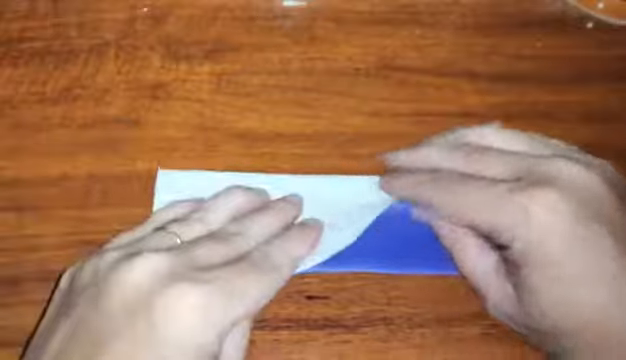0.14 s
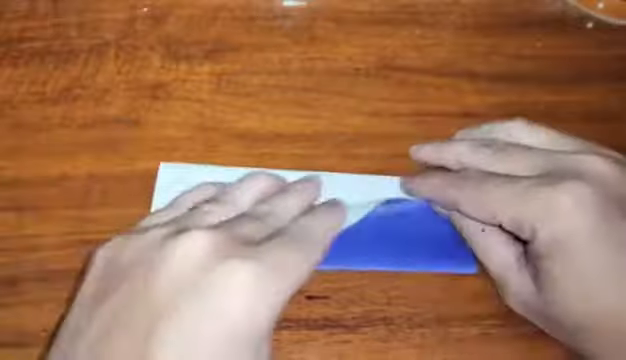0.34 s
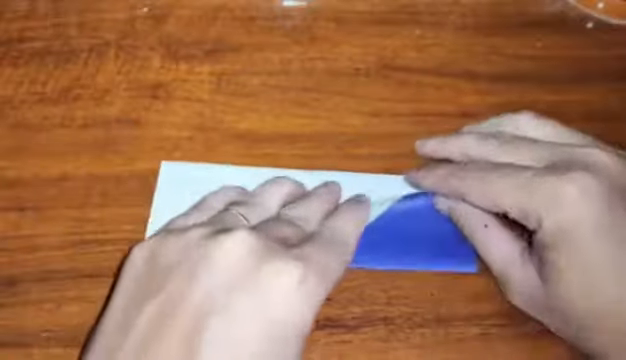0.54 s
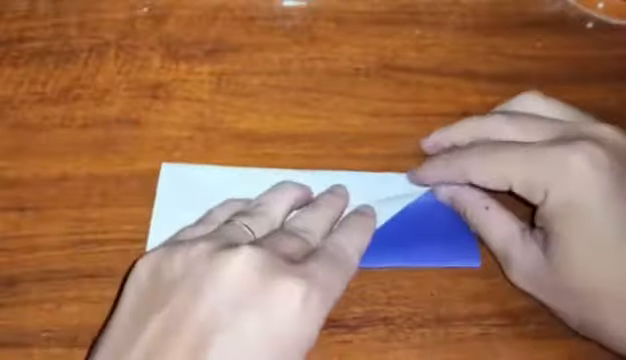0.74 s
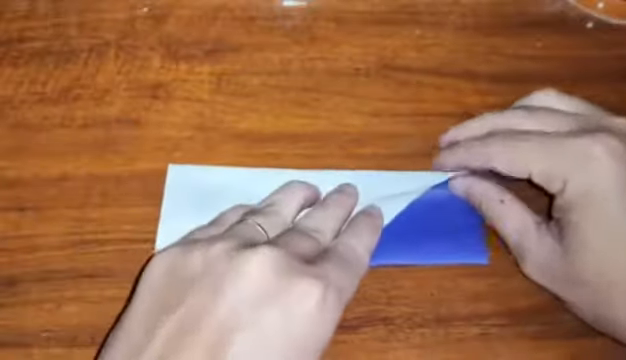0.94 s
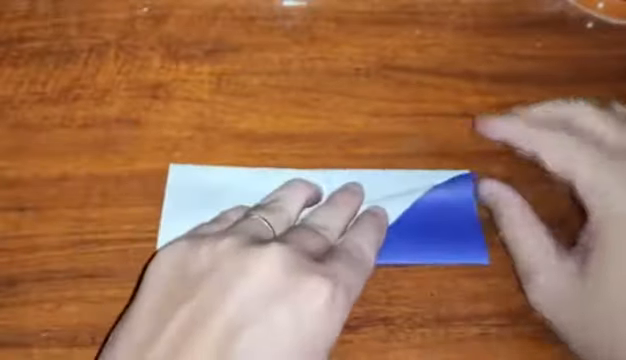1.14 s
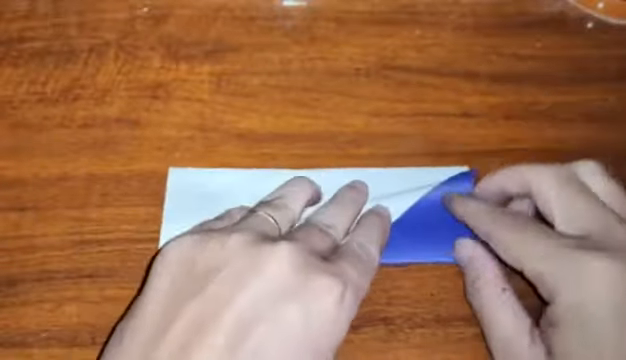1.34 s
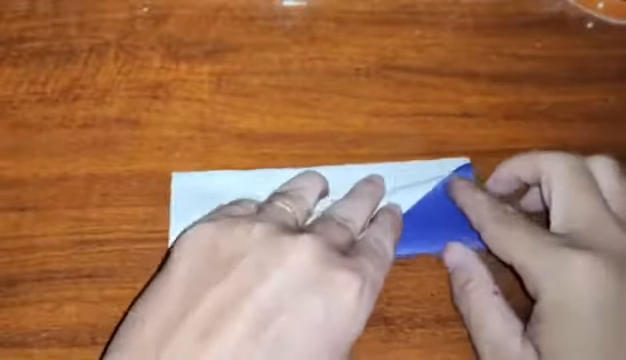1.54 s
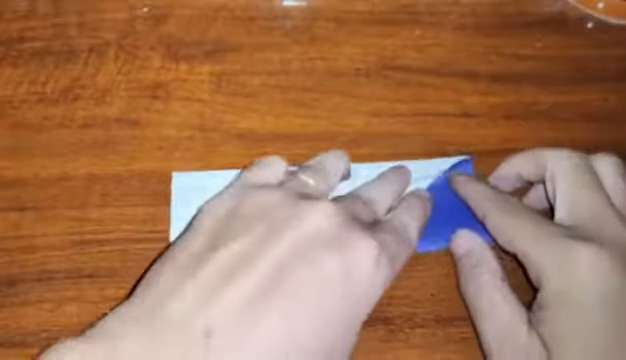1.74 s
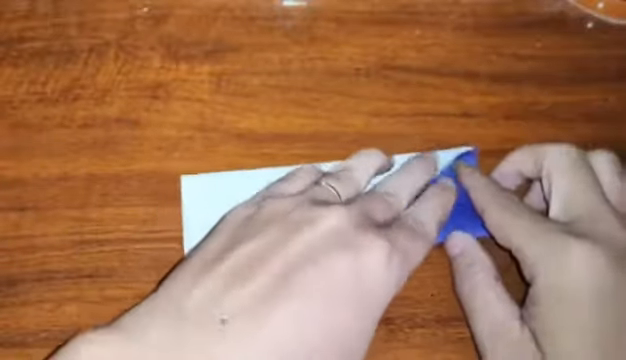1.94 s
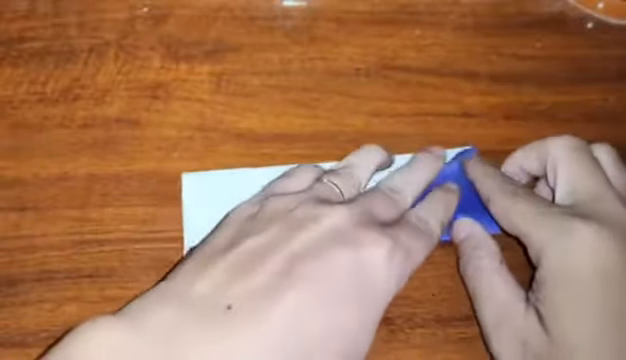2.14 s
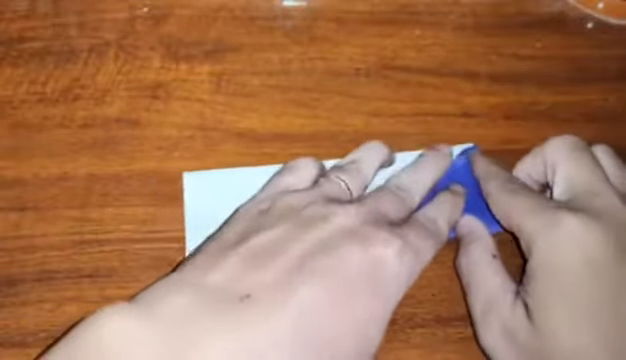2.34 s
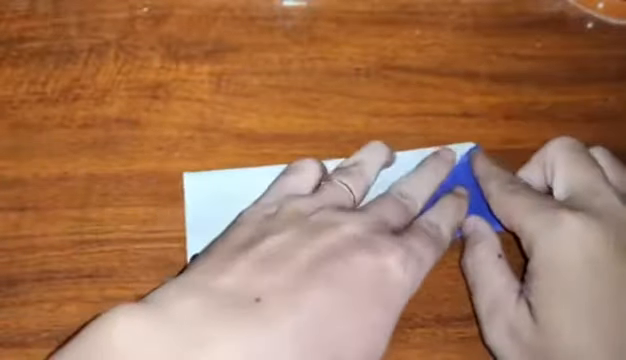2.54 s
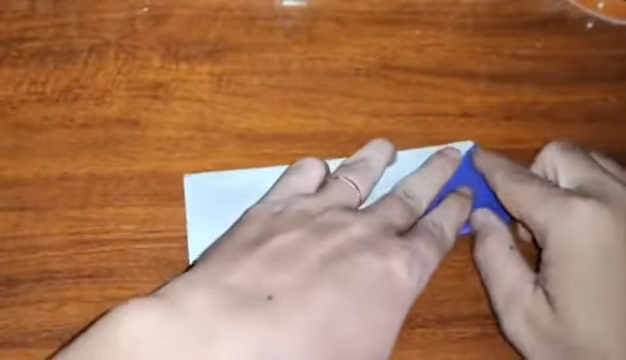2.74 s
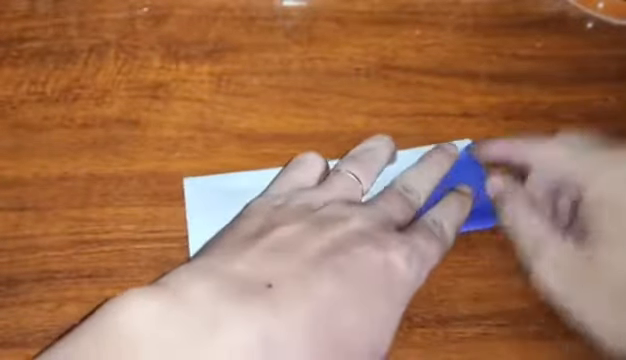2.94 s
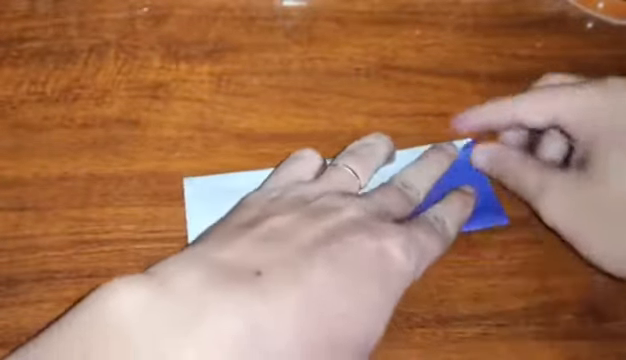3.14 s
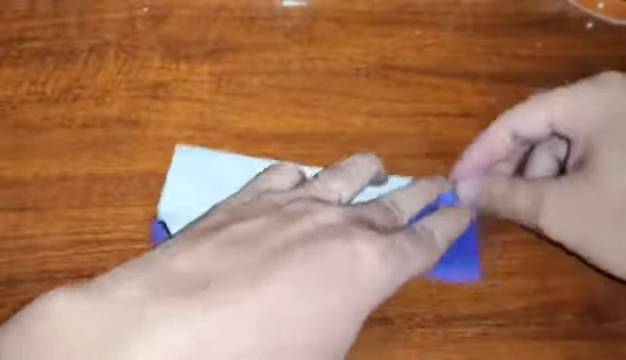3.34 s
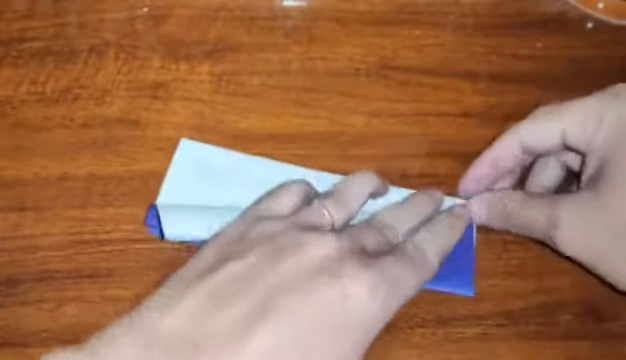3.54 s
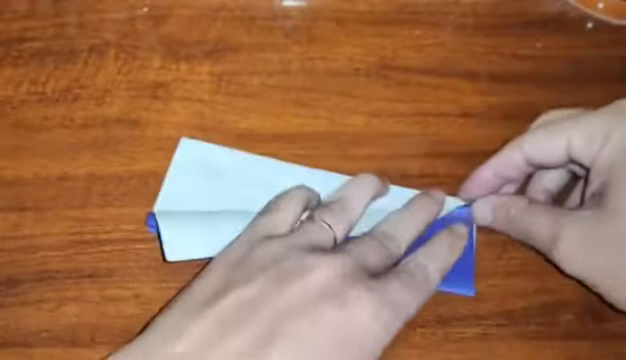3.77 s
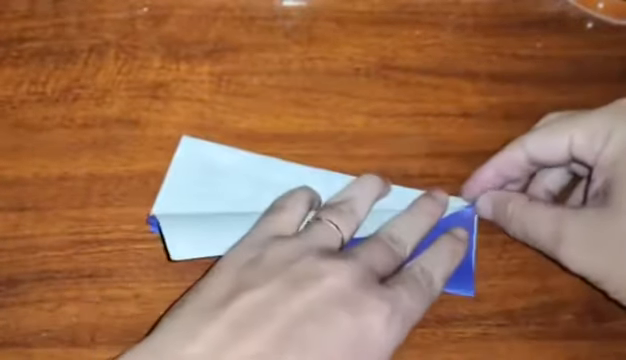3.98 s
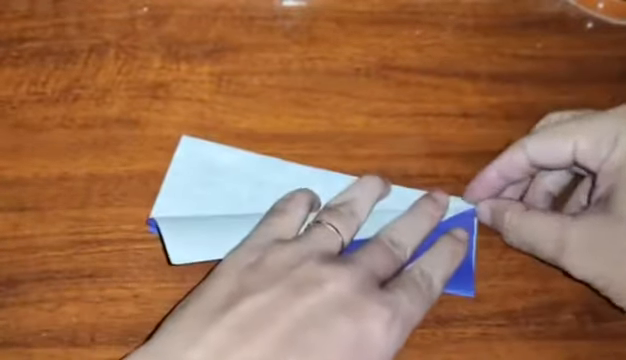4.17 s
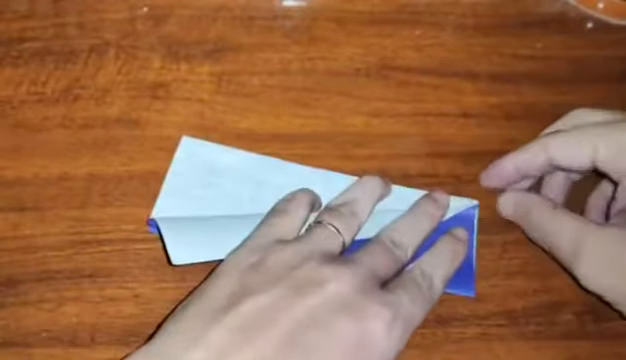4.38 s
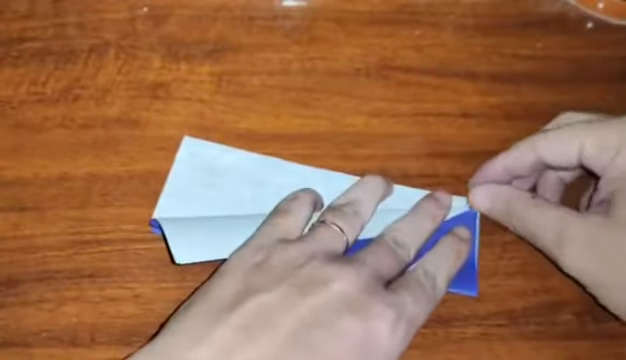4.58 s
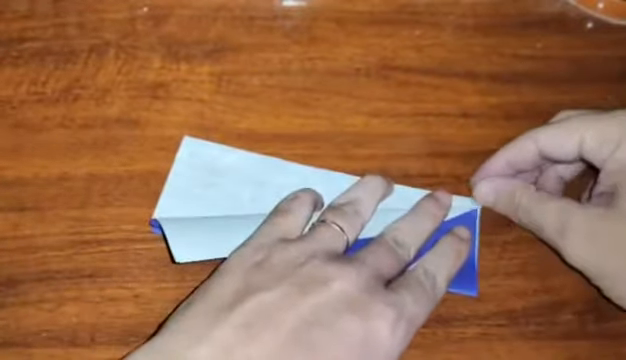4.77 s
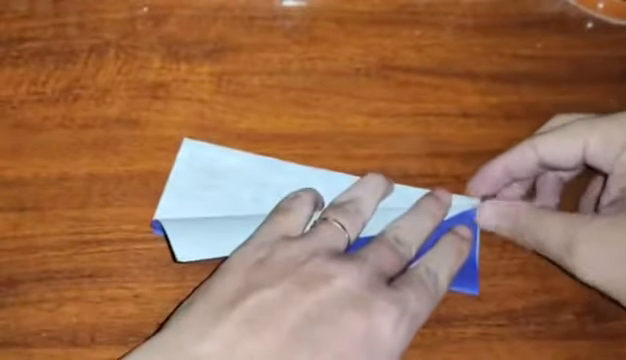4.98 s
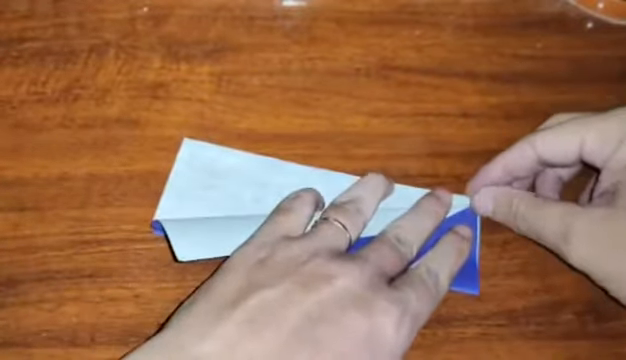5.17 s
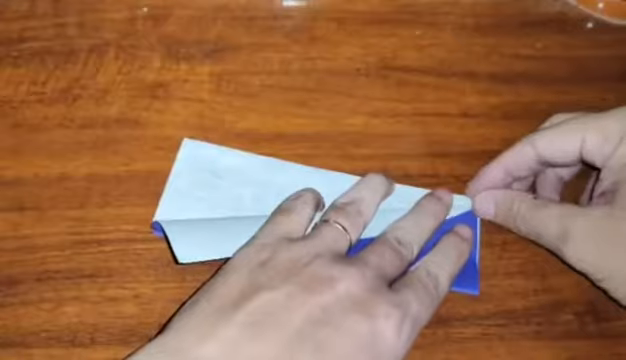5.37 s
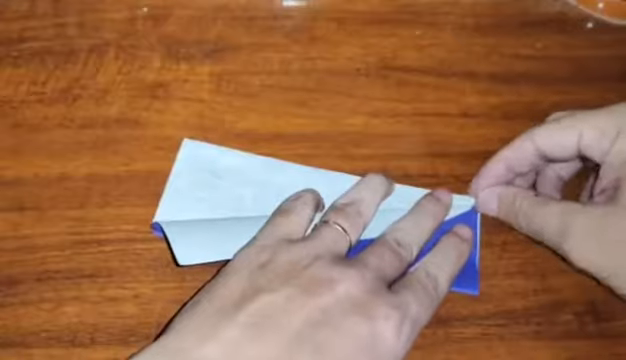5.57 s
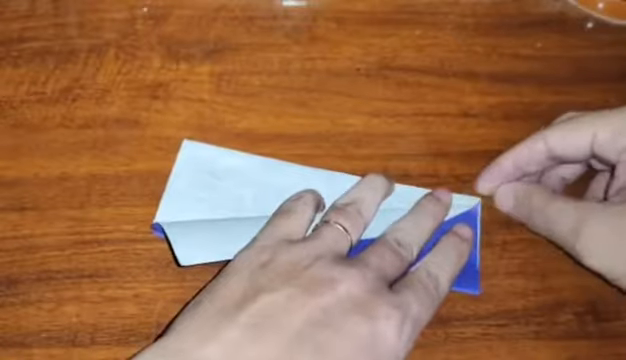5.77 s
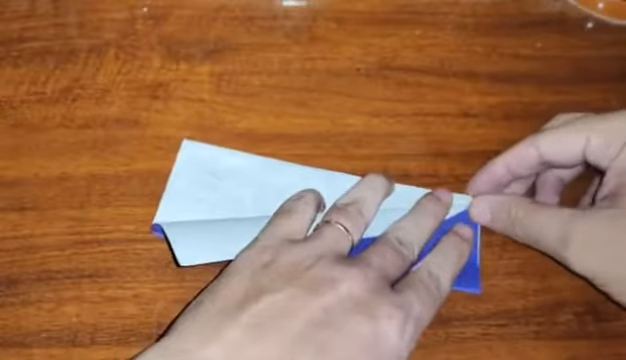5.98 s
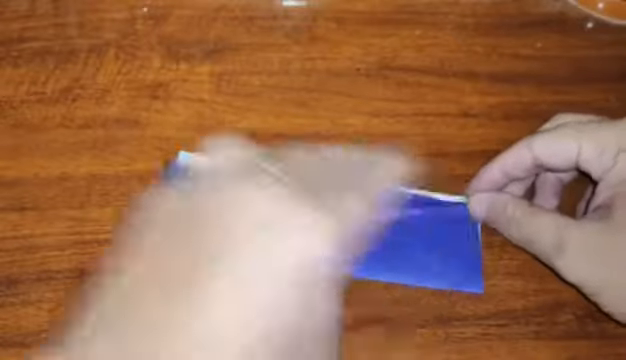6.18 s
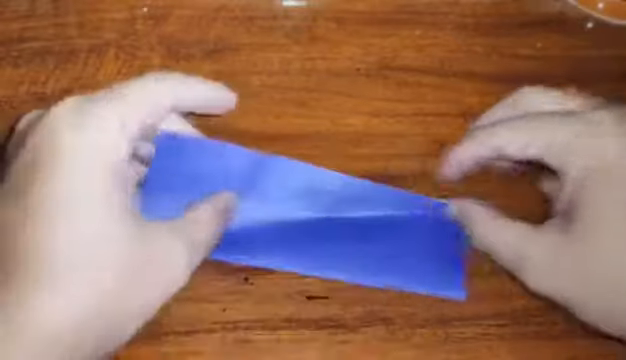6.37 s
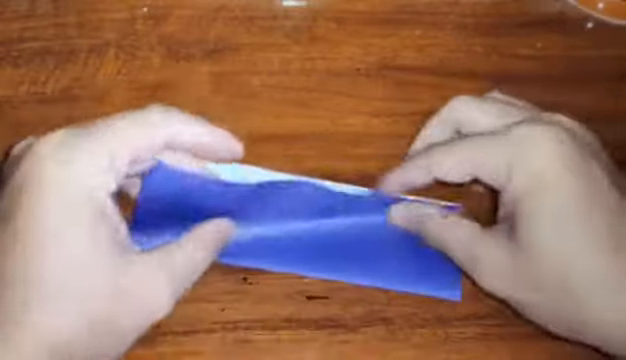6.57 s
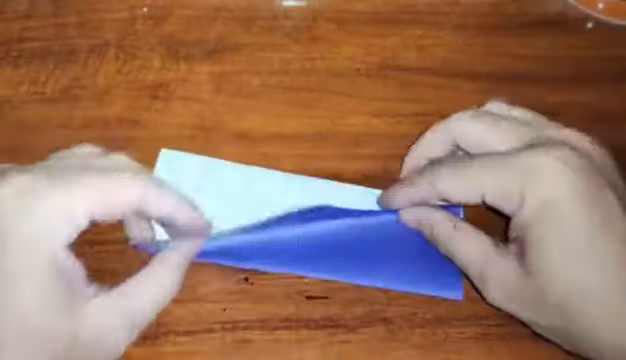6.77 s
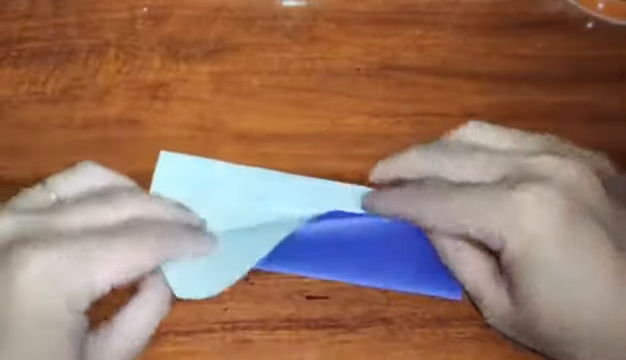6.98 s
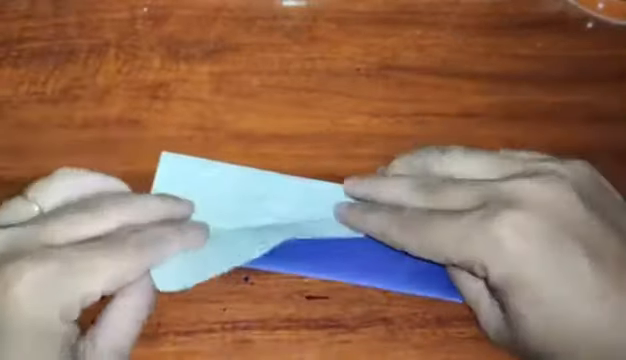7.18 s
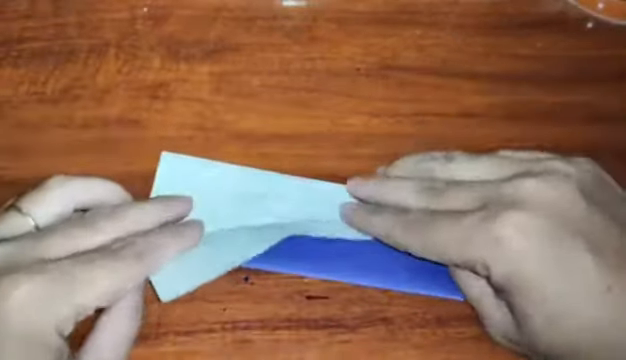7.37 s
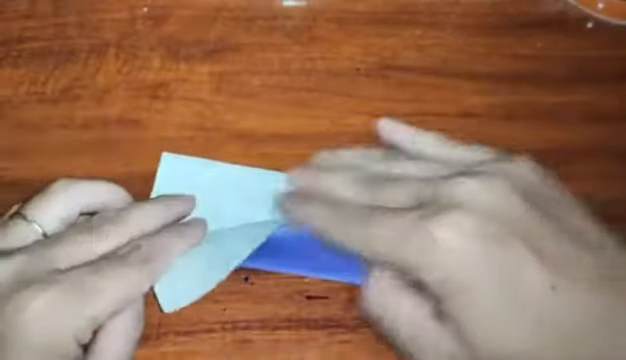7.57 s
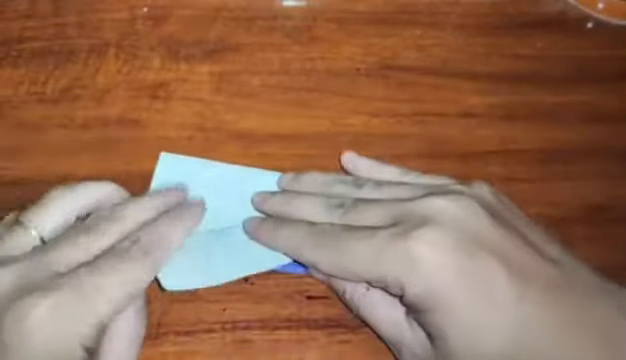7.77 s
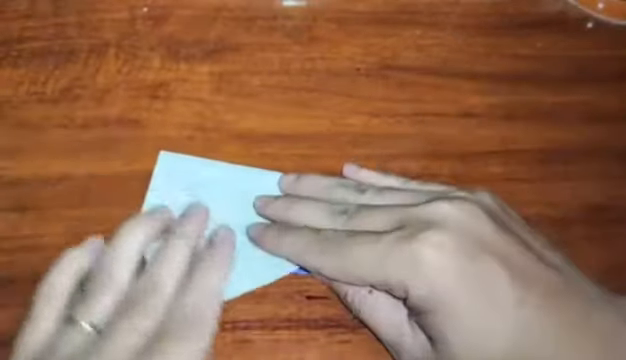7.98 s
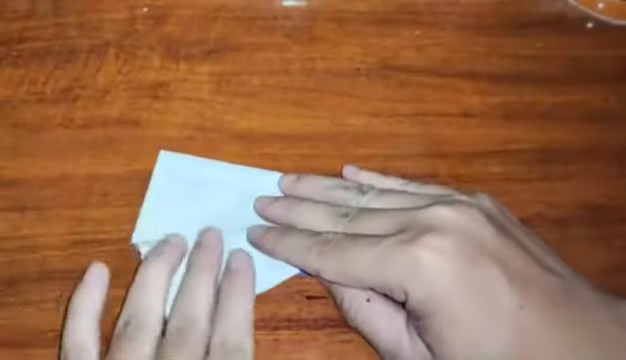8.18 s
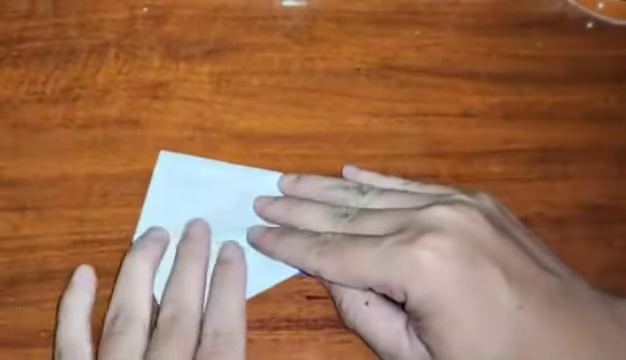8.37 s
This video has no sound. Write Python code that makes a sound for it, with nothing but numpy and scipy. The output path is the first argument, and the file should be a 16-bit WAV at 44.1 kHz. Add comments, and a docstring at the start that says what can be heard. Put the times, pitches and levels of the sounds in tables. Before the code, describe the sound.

Close to a small sheet of paper on a wooden table, fingers slide with bright, grainy hiss and duller rustle. Short crisp rubs and sharp little pops come first, then a quieter spell with only isolated ticks and one clear snap. A louder burst of flipping and creasing follows, with soft fingertip thuds, before it eases off. A small quiet room adds a short tail and faint steady air.

```python
"""Fingers rub over paper with a grainy hiss as two hands fold and crease a sheet in a small quiet room.
The hiss and a duller rustle are filtered noise and random clicks, shaped stroke by stroke.
The sheet buckles in snaps and ticks: short noise bursts with a ringing spectrum.
Fingertips thud softly on the wooden table, a push ringing decaying sine modes.
Sparse random reflections give these sounds a short tail; steady coloured noise is the room's air."""
import sys
import numpy as np
from scipy import signal
from scipy.fft import rfft, irfft, next_fast_len
from scipy.io import wavfile
from scipy.ndimage import uniform_filter1d

SR = 44100
rng = np.random.default_rng(int(sys.argv[2]) if len(sys.argv) > 2 else 0)


def dump_mix(stems):
    """Bounce the given channels to the path in sys.argv[1] as a 16-bit WAV at rate SR."""
    frames = np.atleast_2d(stems).T  # one column per channel
    limited = np.clip(frames, -1, 1)  # hard clip at full scale
    pcm = np.round(limited * 32767).astype(np.int16)
    wavfile.write(sys.argv[1], SR, pcm)


N = 371321
TIME = np.arange(N) / SR

# finger strokes: (start [s], length [s], relative hiss level [dB], relative rustle level [dB],
# swell from start to end [dB], treble lift of the hiss and rustle [dB])
STROKES = [(-0.02, 0.12, -52.5, -55.5, -11, -3.5), (0.096, 0.2, -50, -60, 6, 1.5),
           (0.312, 0.34, -56, -59.5, -5, -0.5), (0.757, 0.022, -62, -62.5, -2, 1),
           (0.806, 0.18, -59, -59.5, -15.5, 1.5), (1.062, 0.12, -59.5, -64.5, -2, 3),
           (1.315, 0.075, -72, -72, 11, 2), (1.419, 0.072, -51.5, -57, -5, -2),
           (1.498, 0.07, -52.5, -60, 3, -2.5), (1.622, 0.057, -51.5, -59, -5, -3),
           (1.69, 0.13, -53, -60.5, -8.5, 0), (1.814, 0.082, -47.5, -52, -6.5, 1.5),
           (1.946, 0.043, -51.5, -52.5, -1.5, 1.5), (1.986, 0.17, -63.5, -64, -2, 0.5),
           (2.196, 0.099, -54.5, -59.5, 2.5, 0), (2.356, 0.088, -59.5, -58.5, -6.5, -3),
           (2.574, 0.25, -73, -67, -8, -1.5), (3.006, 0.035, -52, -56, 5.5, 1),
           (3.283, 0.095, -48.5, -55.5, 2.5, -1.5), (3.386, 0.084, -47, -51, 1, 1),
           (3.5, 0.059, -55.5, -56.5, 5, 1), (3.622, 0.03, -59.5, -63.5, 1, 1.5),
           (3.679, 0.041, -59.5, -60.5, 0, 4.5), (3.858, 0.06, -64.5, -71, 0, 5),
           (3.935, 0.07, -65, -74, -3, 0.5), (4.158, 0.015, -67, -77, -3, 6),
           (4.722, 0.13, -53, -58.5, -14, 1.5), (5.19, 0.25, -81.5, -88, -13, 1.5),
           (5.48, 0.067, -68, -71, 7, 7), (5.679, 0.013, -55.5, -61, 3, 1),
           (6.072, 0.11, -59.5, -62, 17.5, 2), (6.181, 0.11, -47, -54.5, 5, 1),
           (6.309, 0.115, -45, -52, 4, 1.5), (6.47, 0.17, -52, -58.5, -2, 1),
           (6.673, 0.08, -48.5, -58, -1, 0.5), (6.768, 0.096, -46.5, -55, -3, 1.5),
           (6.935, 0.14, -51, -57.5, 5, -1), (7.11, 0.093, -53, -54, 3, 1.5),
           (7.226, 0.075, -50, -58.5, -3, -1), (7.324, 0.11, -51.5, -61.5, -4.5, 0),
           (7.494, 0.1, -52, -58, -1, 1.5), (7.619, 0.24, -51.5, -53.5, 3.5, 2.5),
           (7.952, 0.2, -65, -64.5, -3, 5), (8.153, 0.1, -61.5, -67.5, 0, -1),
           (8.297, 0.12, -55, -64, 14.5, 0.5)]
# fibre friction spectrum: (frequency [Hz], relative density [dB per Hz])
HISS_SPECTRUM = [(1500, -30), (2600, -11), (3400, -6), (4300, -3.5), (5500, -4), (6500, -6.5), (7200, -1),
                 (7700, 2), (8500, -8), (9600, -15), (11000, -20), (13000, -25.5)]
# sheet rustle spectrum: (frequency [Hz], relative density [dB per Hz])
RUSTLE_SPECTRUM = [(100, -22), (200, -18.5), (270, 6.5), (500, 6.5), (900, 3.5), (1400, 6.5), (1800, 5),
                   (2500, 1.5), (3500, 2.5), (6000, -10.5), (13000, -18)]
# reverberation: (frequency [Hz], time to fall 60 dB [s])
ROOM_T60 = [(150, 0.14), (300, 0.56), (800, 0.37), (2100, 0.42), (5500, 0.35), (8000, 0.23), (13000, 0.53)]
# steady room noise: (frequency [Hz], relative density [dB per Hz])
AIR_SPECTRUM = [(18, -59), (30, -31), (92, -13.5), (160, -22), (197, -31.5), (229, -7), (371, -6.5),
                (400, -12), (455, -2), (700, -8.5), (1290, -12.5), (1390, -11), (1660, -19.5), (7430, -29),
                (13000, -50)]
# sheet buckles: (time [s], relative level [dB], decay time constant [s], brightness [dB per octave],
# facet ring [Hz], ring height [dB])
SNAPS = [(0.2795, -27.5, 0.0022, 0, 2480, 12), (0.391, -42.5, 0.011, -1, 7800, 15),
         (0.4374, -34, 0.004, 0.5, 7900, 3), (0.7945, -51, 0.005, 1, 3700, 10),
         (0.7974, -36, 0.005, 1, 3470, 14), (0.7999, -30.5, 0.0049, -0.5, 3750, 7),
         (1.0234, -55.5, 0.0033, -7.5, 5000, 4), (1.195, -53.5, 0.005, -0.5, 4000, 0),
         (1.419, -52, 0.0039, 7, 7000, -1), (1.6135, -50, 0.0022, 2, 4170, 9),
         (1.624, -50, 0.0035, 6, 6400, 0), (1.828, -31.5, 0.004, 1, 7800, 9.5),
         (1.862, -44.5, 0.0033, -5.5, 3630, 9), (1.931, -45.5, 0.0096, -13, 1500, 3),
         (2.19, -51.5, 0.0034, 0.5, 8100, 7), (2.3469, -36.5, 0.003, -4.5, 2750, 8.5),
         (2.7545, -59, 0.0034, -4.5, 4000, 3), (2.759, -49.5, 0.0045, -6.5, 4770, 9.5),
         (4.2414, -56, 0.0025, 2, 5040, 3), (4.2485, -50.5, 0.002, 8, 7000, 9),
         (4.2852, -47, 0.0013, 19, 6800, 20), (4.2922, -49.9, 0.005, 10, 6400, 20),
         (4.2985, -36.5, 0.0016, 8, 6600, 15), (4.3022, -37.5, 0.0016, 6.5, 7030, 8),
         (4.6565, -59, 0.0041, 4, 5920, 12), (4.7169, -26.5, 0.0025, 1, 6100, 9.5),
         (4.845, -49.5, 0.011, 11, 7140, 9), (5.133, -63, 0.0057, 1, 7800, 3),
         (5.4812, -54, 0.0035, 4, 7400, 4), (5.5285, -42, 0.0023, 1.5, 7960, 11),
         (5.689, -49, 0.0049, 9, 8350, 13), (5.693, -42.5, 0.0092, 4, 8300, 11),
         (5.702, -43.5, 0.0039, 6, 7580, 0.5), (6.094, -54, 0.0054, 6, 7600, 4.5),
         (6.2297, -43.5, 0.0076, -4, 5400, 3), (6.2504, -34.5, 0.0048, 2.5, 5700, 14),
         (6.3128, -23.5, 0.0028, 3, 5800, 6.5), (6.465, -48, 0.005, -8.5, 3300, 9),
         (6.544, -43.5, 0.004, 3, 7300, 5), (6.575, -47.5, 0.003, -3.5, 1390, 10),
         (6.607, -47, 0.0029, -3, 3130, 10), (6.69, -38, 0.0072, 2.5, 5300, 5),
         (6.696, -40, 0.0067, -9.5, 4200, 18.5), (6.8511, -42, 0.0063, -6, 3370, 12),
         (6.9253, -39, 0.0037, -4.5, 2370, 3), (6.9953, -46, 0.0064, -9, 2410, 8),
         (7.1625, -36, 0.0031, -3, 4300, 12.5), (7.2545, -44.5, 0.005, 5, 5940, 13),
         (7.358, -47, 0.0043, 10, 4270, 18), (7.523, -41, 0.0037, -2.5, 5270, 4.5),
         (7.7633, -37.5, 0.0059, -4, 4110, 11), (7.8154, -46, 0.0022, -3.8, 1960, 17),
         (7.844, -46.5, 0.0028, -10, 1960, 8), (7.8546, -43, 0.0074, 4.5, 2630, 16),
         (7.9499, -49.5, 0.011, 1.5, 4400, 10), (8.012, -54.5, 0.0059, 8, 7950, 4),
         (8.0608, -49, 0.0042, 3, 4800, 9), (8.072, -45.5, 0.0034, -8.5, 3360, 17)]
# spectrum common to the buckles: (frequency [Hz], relative density [dB per Hz])
SNAP_SPECTRUM = [(150, -44.5), (300, -13.5), (900, -12), (1500, -3), (2100, -4.5), (3300, -2), (4600, -4),
                 (5400, 0), (6400, -9), (7600, 2.5), (8300, -5.5), (9200, -14), (11000, -23),
                 (13000, -31.5)]
# fingertip landings: (time [s], level [dB], scuff decay time constant [s], boom against knock [dB])
THUDS = [(1.439, -47, 0.01, -36), (1.931, -61, 0.0089, -20), (1.977, -62, .006, -27),
         (3.252, -49, 0.0069, -18), (3.27, -57, 0.0067, -23), (3.408, -53, 0.031, -26),
         (3.456, -55, 0.0058, -20), (3.609, -53.5, .005, -25), (3.638, -54, 0.0095, -5.5),
         (3.745, -71, .008, 3), (4.475, -54.5, .007, -34), (6.389, -65, .012, -28),
         (6.585, -41, 0.0042, -19.5), (6.606, -48.5, .005, -28), (7.006, -53, 0.0059, -19),
         (7.297, -52.5, 0.013, -25), (7.565, -56, 0.0063, -9), (7.86, -64, .006, 1)]
# table-top modes: (frequency [Hz], width [Hz], relative drive [dB])
TABLE_MODES = [(286, 47.6, -4.5), (336, 48, 1), (531, 150, -7), (810, 200, -14)]
# lowest table mode, the boom: (frequency [Hz], width [Hz])
TABLE_BOOM = (133, 89)
# filter on the stereo side signal: (frequency [Hz], gain [dB])
SIDE_FILTER = [(100, -56), (3500, -61), (4300, -15.5), (5000, -3.5), (6300, -1.5), (7500, -1.5), (9500, -3),
               (12000, -12.5)]

ATTACK_S, RELEASE_S = 0.012, 0.015  # shortest ramp; shortest decay time constant
EASE_SHARE = 0.096  # of the stroke length, added to both
REST_HISS_DB, REST_RUSTLE_DB = -84, -72.5  # the sheet stirs under resting hands; relative like STROKES
AIR_DB = -66.3
TICKS_PER_S, TICK_DB, TICK_SPREAD_DB = 26, -8, 2  # TICK_DB: least level against the stroke
TICK_DECAY_S, TICK_RING_HZ, TICK_RING_DB = 0.0039, (1400, 6930), 8
TICK_BRIGHT_DB, TICK_TILT_DB = -1.5, 3  # per octave: mean, scatter either way
EDGE_HZ = 13250


def gain_of(db):
    """Decibels to amplitude."""
    return 10 ** (np.asarray(db) / 20)


def evened(x):
    """Each channel scaled to rms 1."""
    return x / np.sqrt(np.mean(x ** 2, axis=-1, keepdims=True) + 1e-20)


def read(points, hz):
    """Curve joined by straight lines on a log-frequency axis."""
    f, value = np.transpose(points)
    return np.interp(np.log(hz + 1), np.log(f + 1), value)


def add(mix, s, sound):
    """Mixes a sound in at time s."""
    part = mix[:, max(round(s * SR), 0):][:, :sound.shape[1]]
    part += sound[:, :part.shape[1]]


def filtered(x, points):
    """Applies a gain curve to a long signal, without phase shift."""
    size = next_fast_len(N)
    gain = gain_of(read(points, np.fft.rfftfreq(size, 1 / SR)))
    return irfft(rfft(x, size) * gain, size)[..., :N]


def coloured(x, points):
    """Gives a long signal a spectrum, at rms 1."""
    return evened(filtered(x, points))


def causal(db):
    """Minimum-phase response with these gains: it rings only after its cause."""
    log_gain = np.log(gain_of(np.r_[db, db[-2:0:-1]]))
    return np.exp(np.conj(signal.hilbert(log_gain)))[:len(db)]


def wander(per_s):
    """Random curve of rms 1 with this many knots a second."""
    return evened(np.interp(TIME * per_s, np.arange(16384), rng.standard_normal(16384)))


def strokes():
    """A stroke starts quickly, swells or eases, dies away: hiss gain, rustle gain, treble lift in dB."""
    hiss_power, rustle_power, weighted_lift = np.zeros((3, N))
    for start, length, hiss_db, rustle_db, swell_db, lift_db in STROKES:
        attack = ATTACK_S + EASE_SHARE * length
        release = RELEASE_S + EASE_SHARE * length
        on = slice(*np.searchsorted(TIME, [start - attack / 2, start + length + 10 * release]))
        t = TIME[on] - start
        ramp = np.clip(t / attack + 0.5, 0, 1)
        fall = np.exp(-np.maximum(t - length, 0) / release)
        shape = ramp * fall * gain_of(swell_db * (np.clip(t / length, 0, 1) - 0.5))
        power = (shape * gain_of(hiss_db)) ** 2
        hiss_power[on] += power
        weighted_lift[on] += power * lift_db
        rustle_power[on] += (shape * gain_of(rustle_db)) ** 2
    hiss_power = hiss_power + gain_of(REST_HISS_DB) ** 2
    rustle_power = rustle_power + gain_of(REST_RUSTLE_DB) ** 2
    return np.sqrt(hiss_power), np.sqrt(rustle_power), weighted_lift / hiss_power


def friction(grains_per_s, spread_db, smooth, slip_db):
    """Fibres catch and let go: uneven tiny clicks over smooth hiss, clumped by stick and slip."""
    caught = rng.random(N) < grains_per_s / SR
    size = gain_of(spread_db * np.minimum(rng.exponential(1, N), 4))
    grains = evened(caught * size * rng.choice([-1., 1.], (2, N)))
    return (grains + smooth * rng.standard_normal((2, N))) * gain_of(slip_db * wander(110))


def drifting(x, lift_db, patch_db, bins=9, frames=26):
    """Sheet resonances shift with bending and fingers: random spectral patches, plus a treble lift."""
    hz, t, z = signal.stft(x, SR, nperseg=512, noverlap=384)
    patches = uniform_filter1d(rng.standard_normal(z.shape[1:]), bins, 0)
    patches = uniform_filter1d(patches, frames, 1)
    # half the lift is added above 7200 Hz, half taken off below 5800 Hz
    top = np.clip((hz[:, None] - 5800) / 1400, 0, 1) - 0.5
    z = z * gain_of(patch_db * patches / patches.std() + top * np.interp(t, TIME, lift_db))
    return evened(signal.istft(z, SR, nperseg=512, noverlap=384)[1][:, :N])


def rubbing(hiss_gain, rustle_gain, lift_db, hiss_trim_db=0.55, rustle_trim_db=0.1):
    """Skin and paper slide: bright hiss at the contact, duller rustle from the sheet."""
    drive = friction(grains_per_s=3000, spread_db=-0.5, smooth=1.0, slip_db=2.0)
    flex = friction(grains_per_s=700, spread_db=3.0, smooth=0.69, slip_db=1.73)
    hiss = drifting(coloured(drive, HISS_SPECTRUM), lift_db, patch_db=3.0)
    rustle = drifting(coloured(flex, RUSTLE_SPECTRUM), lift_db, patch_db=2.0, bins=5)
    return hiss * hiss_gain * gain_of(hiss_trim_db) + rustle * rustle_gain * gain_of(rustle_trim_db)


def room(x, gap_s=0.0019):
    """Sparse reflections of random sign build up after a short gap; each band dies at its own speed."""
    size = 28000
    taps = rng.choice([-1., 1.], (2, size)) * (rng.random((2, size)) < 4000 / SR)  # 4000 per s
    taps *= np.clip(np.arange(size) / SR / gap_s - 0.5, 0, 1)
    hz, t, z = signal.stft(taps, SR, nperseg=256)
    decay = gain_of(-60 * t / read(ROOM_T60, hz)[:, None])
    tail = signal.istft(z * decay, SR, nperseg=256)[1]
    tail = tail / np.linalg.norm(tail, axis=1, keepdims=True)
    return signal.fftconvolve(x, tail, axes=1)[:, :N]


def air(waver_db=2.4):
    """Quiet room noise, coloured and wavering slightly."""
    noise = coloured(rng.standard_normal((2, N)), AIR_SPECTRUM)
    return noise * gain_of(AIR_DB + waver_db * wander(9.8))


def crinkles(effort, count=400):
    """Small buckles at random moments, scaled to the rubbing that sets them off; rows like SNAPS."""
    rows = []
    low_hz, high_hz = TICK_RING_HZ
    for when, chance, size, tilt, facet in rng.random((count, 5)):
        if chance < TICKS_PER_S * N / SR / count:
            stroke_db = 20 * np.log10(effort[int(when * N)])
            db = stroke_db + TICK_DB + TICK_SPREAD_DB * min(-np.log(1 - size), 2)
            bright = TICK_BRIGHT_DB + TICK_TILT_DB * (2 * tilt - 1)
            ring_hz = low_hz * (high_hz / low_hz) ** facet
            rows.append((when * N / SR, db, TICK_DECAY_S, bright, ring_hz, TICK_RING_DB))
    return rows


def snaps(buckles, trim_db=-0.6, ring_octaves=0.13, rise_s=0.00017, evenness=0.69):
    """A facet of the sheet pops through: a burst of bending waves ringing for milliseconds."""
    size = 2048
    t, hz = np.arange(size) / SR, np.fft.rfftfreq(size, 1 / SR)
    octave, out = np.log2(np.maximum(hz, 100)), np.zeros((2, N))
    for s, db, decay, bright, ring_hz, ring_db in buckles:
        decay = max(decay, 0.0003)
        envelope = (1 - np.exp(-t / rise_s)) * np.exp(-t / decay)
        burst = rfft(rng.standard_normal((1, size)) * envelope)
        # partly flatten the random burst, so that the snap's set spectrum and ring stand out
        lumps_db = 10 * np.log10(uniform_filter1d(abs(burst[0]) ** 2, size=25) + 1e-12)
        slope = bright * np.clip(octave - np.log2(4000), -2, 1.5)
        # the shorter the pop, the broader its ring
        detune = (octave - np.log2(ring_hz)) / ring_octaves
        ring = ring_db / (1 + detune ** 2 * decay / 0.0038)
        response_db = read(SNAP_SPECTRUM, hz) + slope + ring - evenness * lumps_db
        pop = evened(irfft(burst * causal(response_db)))
        add(out, s, gain_of(db + trim_db) * pop * np.sqrt(0.01 * SR / size))  # energy as over 10 ms
    return out


def thuds(scuff=1.0, push_s=0.0008, low_hz=245):
    """A soft push, with scuffing while the finger settles, rings the table top."""
    size = 6000
    t, out = np.arange(size) / SR, np.zeros((2, N))
    wood = np.zeros(size)
    for hz, width_hz, db in TABLE_MODES:
        wood += gain_of(db) * np.exp(-np.pi * width_hz * t) * np.sin(2 * np.pi * hz * t) * width_hz
    # steep high-pass at low_hz keeps the knock free of deep bass
    wood = signal.sosfilt(signal.butter(10, low_hz, "high", fs=SR, output="sos"), wood)
    boom_hz, boom_width_hz = TABLE_BOOM
    boom = evened(t * np.exp(-np.pi * boom_width_hz * t) * np.sin(2 * np.pi * boom_hz * t))
    for s, db, contact, boom_db in THUDS:
        push = t / push_s * np.exp(-t / push_s)
        push = push + scuff * rng.standard_normal(size) * np.exp(-t / contact)
        knock = evened(signal.fftconvolve(push, wood)[:size]) + gain_of(boom_db) * boom
        level = gain_of(db) * np.sqrt(0.01 * SR / size)  # energy as over 10 ms
        add(out, s, level * np.array([knock, knock]))
    return out


def scene(snap_room_db=-8.5, rub_room_db=-7, thud_room_db=-8, rub_side_db=-5, air_side_db=-4):
    """Mid and side to stereo: dry snaps and thuds central; rubbing, air and tail wide in the treble."""
    hiss, rustle, lift_db = strokes()
    pops = snaps(list(SNAPS) + crinkles(np.hypot(hiss, rustle)))
    rub = rubbing(hiss, rustle, lift_db)
    knocks = thuds()
    still = air()
    send = gain_of(snap_room_db) * pops + gain_of(rub_room_db) * rub + gain_of(thud_room_db) * knocks
    wet = room(send)
    # channel 0 feeds mid, channel 1 side
    mid = (pops + rub + knocks + wet + still)[0]
    side = (wet + gain_of(rub_side_db) * rub + gain_of(air_side_db) * still)[1]
    side = filtered(side, SIDE_FILTER)
    return np.array([mid + side, mid - side])


def record(dry):
    """Linear-phase low-pass at EDGE_HZ limits the band."""
    taps = signal.firwin(301, EDGE_HZ, window=("kaiser", 8), fs=SR)
    return signal.oaconvolve(dry, taps[None], "same", axes=1)


dry = scene()
out = record(dry)
dump_mix(out)
```